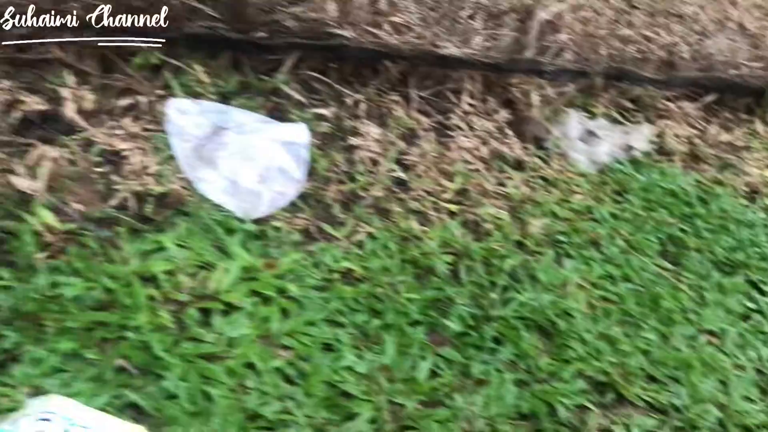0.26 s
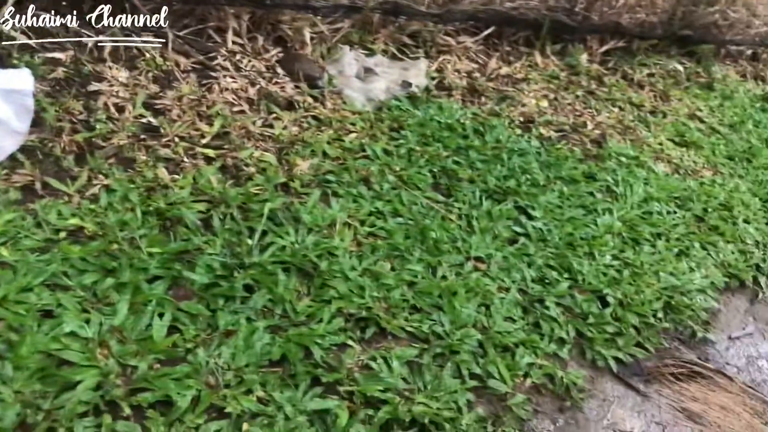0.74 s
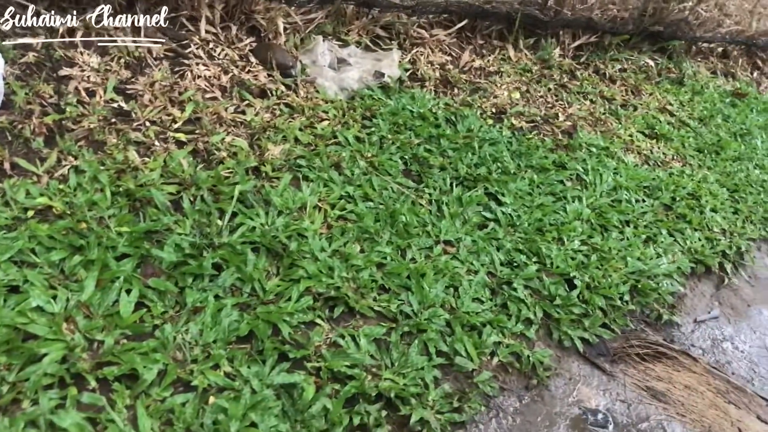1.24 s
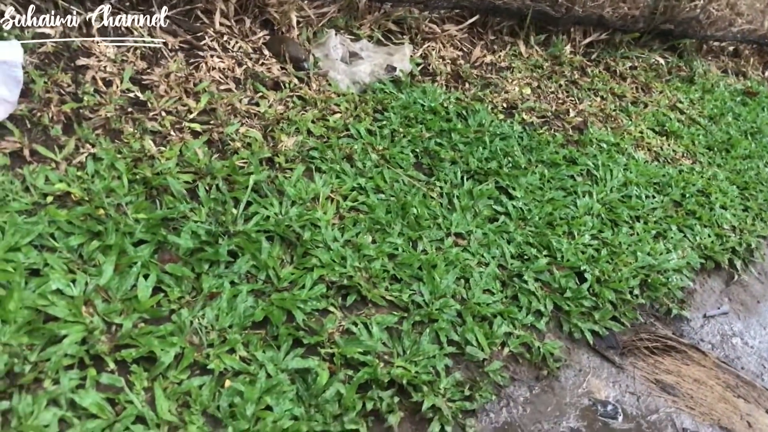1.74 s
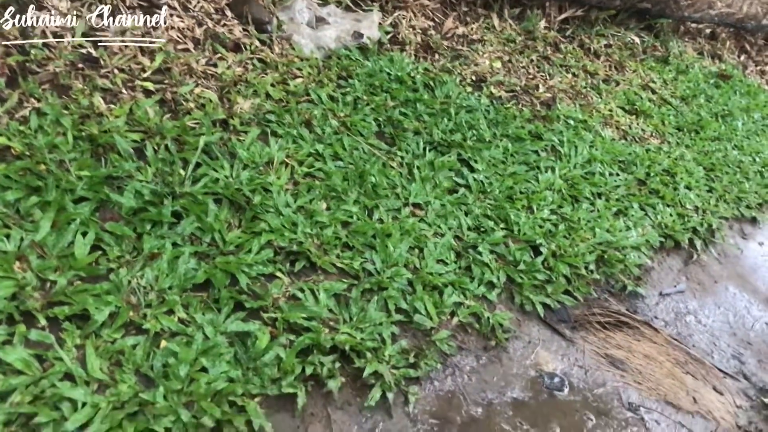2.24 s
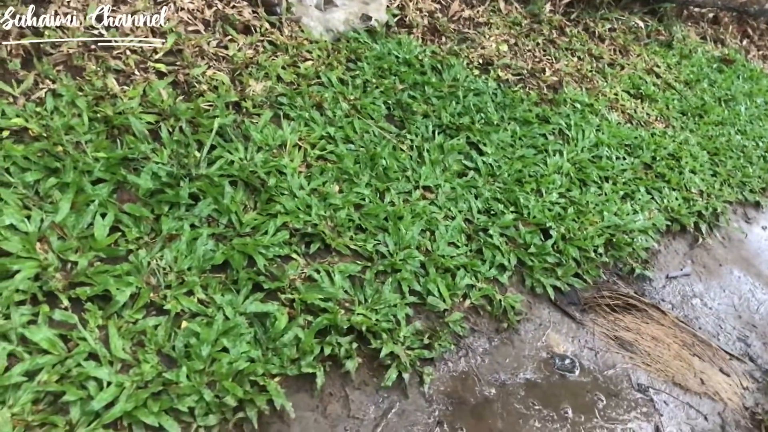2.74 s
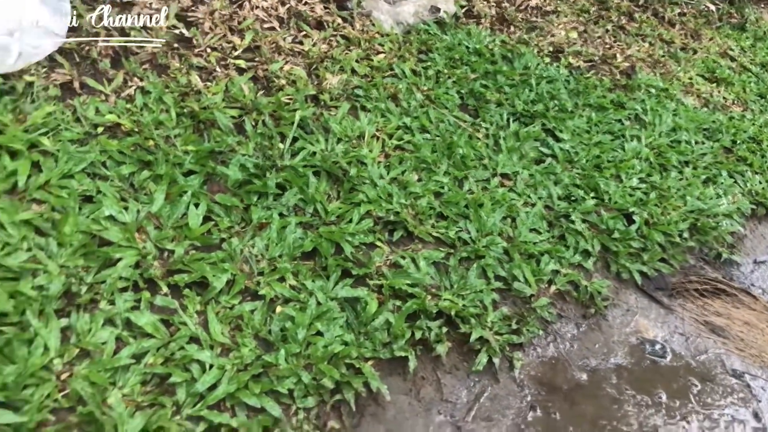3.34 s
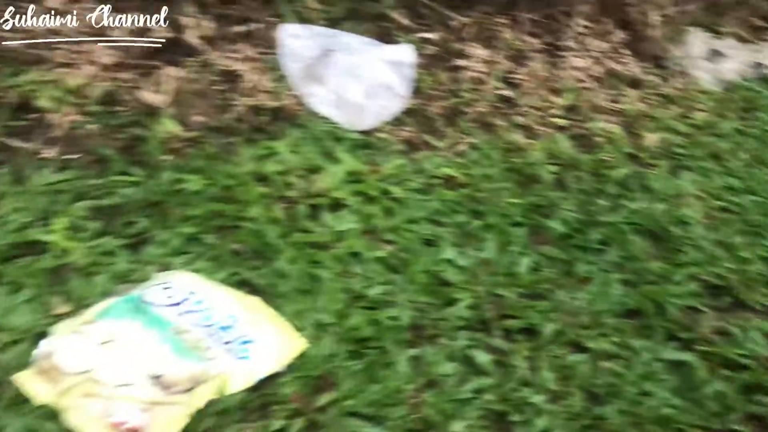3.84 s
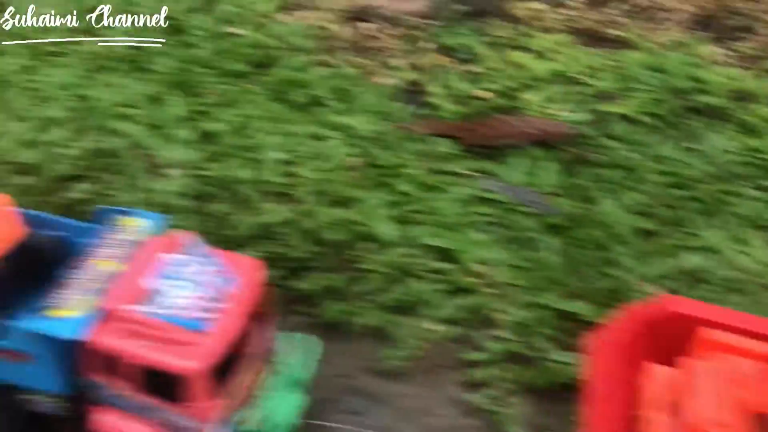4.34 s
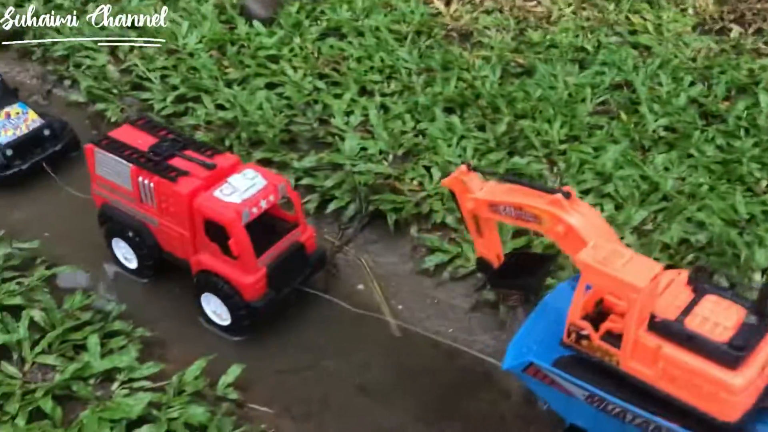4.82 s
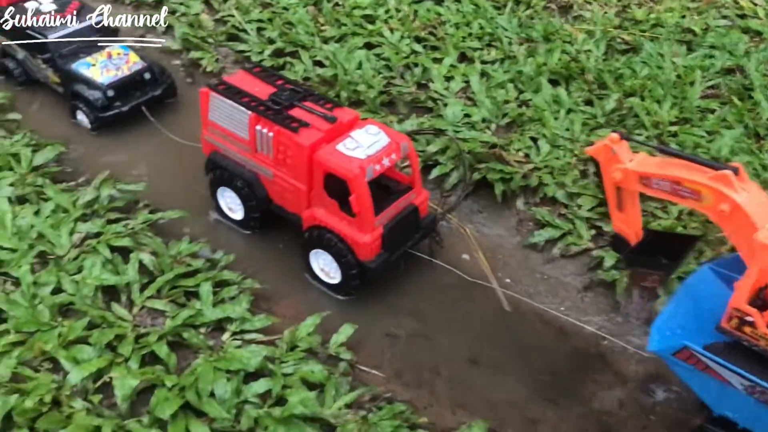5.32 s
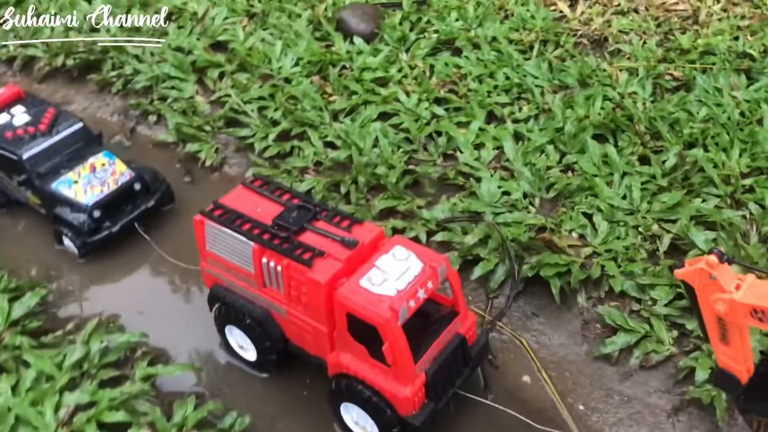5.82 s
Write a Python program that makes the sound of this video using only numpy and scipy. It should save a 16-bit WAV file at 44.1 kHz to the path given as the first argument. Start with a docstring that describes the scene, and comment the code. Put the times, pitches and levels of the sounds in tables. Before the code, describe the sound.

Someone shifts on wet grass and dead leaves beside plastic toy trucks. A busy first part of crunches, hollow clacks and crisp ticks holds one hard snap; it thins out, then a tight crunchy cluster returns. A cracking thump hits the microphone, fabric swishes with airy hiss, and toy wheels rasp in mud with light knocks. Dry, close outdoor sound with quiet rumbling air.

```python
"""Someone shifts on wet grass and dead leaves beside plastic toy trucks, heard in open air for six seconds.
Crunching scuffs (ringing fractures), hollow knocks (short rings with noise) and leaf ticks (bright noise)
begin over a low rumble; a squeak (gliding harmonics) comes early, then a plastic snap (decaying modes).
Later come a tap on the microphone (crack, rings and thump), a faint chirp (gliding tone) and a long hissy
swish, as of clothing rubbing (filtered noise); at last toy wheels grind in mud (fractures again)."""
import sys
import numpy as np
from scipy import signal
from scipy.fft import rfft, irfft, next_fast_len
from scipy.io import wavfile
from scipy.ndimage import uniform_filter1d

SR = 44100
rng = np.random.default_rng(int(sys.argv[2]) if len(sys.argv) > 2 else 0)


def store_wav(level_fs):
    """Save 16-bit WAV to argv[1]."""
    pcm = np.round(np.clip(np.atleast_2d(level_fs), -1, 1) * 32767)
    wavfile.write(sys.argv[1], SR, pcm.T.astype(np.int16))


N = 267819

# Hollow knocks: (time [s], ring frequency [Hz], ring rms over 10 ms [dB], contact hardness [0-1])
KNOCKS = [(0.242, 580, -42.5, 0.1), (0.4002, 566, -33, 0.37), (0.4468, 625, -43, 0.1),
          (0.8892, 365, -24.5, 0.45), (0.9013, 633, -31.5, 0.5), (0.943, 645, -33, 0.3),
          (0.9635, 368, -36, .1), (0.977, 905, -33.5, 0), (1.006, 383, -38.5, 0.2), (1.056, 645, -41, 0.66),
          (1.112, 606, -39, 1), (1.1586, 720, -34.5, 0.89), (1.181, 687, -31.5, 0.2),
          (1.244, 574, -39, .05), (1.404, 610, -44.5, 0.67), (1.6093, 780, -44.5, 0.4),
          (1.634, 940, -38.5, 0.68), (1.645, 815, -34.5, 0.52), (1.965, 990, -33.5, 0.45),
          (2.188, 657, -35.5, .6), (2.28, 1084, -33.5, 0.8), (2.322, 284, -35.5, 0.4),
          (2.41, 630, -40.5, 0.78), (2.919, 1150, -51.5, 0.77), (3.211, 880, -48, .4),
          (3.3636, 605, -32.5, .5), (3.4, 428, -26.5, 0.56), (3.4044, 517, -25.5, .5),
          (3.4246, 540, -27.5, 0), (3.5145, 570, -40, .05), (3.598, 334, -46, 0.7), (3.856, 593, -40, 0.86),
          (4.906, 1020, -42.5, .3), (5.0166, 647, -35.5, 0.53), (5.288, 540, -38, 0.74),
          (5.3608, 480, -36.5, 0.2), (5.611, 387, -39, .4), (5.657, 586, -37.5, .15),
          (5.714, 2230, -38.5, 0.88), (5.8, 520, -37, .5), (5.968, 560, -38, 0.3),
          (6.044, 1160, -34.5, 0.77)]
# Scuffs of a shoe: (start [s], end [s], crunch level [dB], grit relative to crunch [dB])
SCUFFS = [(0.0, 0.037, -41.5, -14), (0.378, 0.424, -41, -23), (0.891, 0.918, -38.5, -8),
          (0.949, 1.013, -41, -20), (1.109, 1.2, -35, -17), (1.208, 1.225, -42, -9.5),
          (1.633, 1.641, -41, -7), (2.314, 2.411, -43, -10), (3.354, 3.378, -34, -22),
          (3.395, 3.459, -34.5, -16.5), (3.464, 3.492, -39.5, -20)]
# Low, hollow resonances of the crunch: (frequency [Hz], width [Hz], relative level [dB])
HOLLOW_MODES = [(131, 124, -8), (270, 57, -5), (367.5, 61, -0.5), (556, 62, 1.5), (655, 73, -1),
                (935, 163, -5.5)]
# Rasping upper resonances of the crunch: (frequency [Hz], width [Hz], relative level [dB])
RASP_MODES = [(1374, 200, 1), (1715, 205, -0.5), (2250, 1300, -8)]
# Pull on the wheels grinding in mud: (time [s], relative level [dB])
WHEEL_PULL = [(4.7, -35), (4.9, -14), (5.08, 1), (5.27, -0.5), (5.42, -4.5), (5.7, 1), (5.82, -2.5),
              (5.9, -6.5), (6.07, -6)]
# Modes of the snapping plastic: (frequency [Hz], relative level [dB], t60 [s])
SNAP_MODES = [(604, -24, 0.045), (1030, -18, 0.029), (1310, -20, .018), (1690, -15.5, 0.017),
              (1840, -20, 0.016), (2300, -12, 0.01), (2630, -22.5, .012), (3260, -23.5, 0.015),
              (3770, -17.5, 0.0046), (4680, -22.5, 0.0078), (5630, -25, 0.02), (8400, -36, 0.019)]
# Contacts of the snap: (time [s], relative level [dB])
SNAP_CONTACTS = [(1.292, 1), (1.294, -11)]
# Swishes: (start [s], end [s], initial top level [dB], initial body level [dB])
SWISHES = [(0.537, 0.68, -55, -49), (0.9, 1.118, -59.5, -55.5), (3.9, 4.01, -53, -54),
           (4.01, 4.1, -47.5, -47.5), (4.283, 4.533, -36, -37), (4.53, 4.672, -38.5, -40.5),
           (4.78, 5.137, -52.5, -48.5), (5.39, 5.51, -47.5, -49), (5.618, 5.71, -53, -54),
           (5.87, 5.945, -48, -50)]
# Background hiss, stronger in the last seconds: (time [s], top level [dB], body level [dB])
HISS = [(0, -63, -60.5), (0.8, -59, -56.5), (1.5, -64, -61), (3.7, -62, -61), (4.2, -61, -50.5),
        (4.72, -54, -51), (5.3, -54, -50.5), (6.07, -54.5, -55)]
# Noise spectrum of the thin top of swish and hiss: (frequency [Hz], relative density [dB per Hz])
SWISH_TOP = [(6200, -10.5), (7600, -7.5), (9000, -2.5), (10400, -7), (12000, 0), (15500, 0.5),
             (16000, -7.5)]
# Noise spectrum of the body of swish and hiss: (frequency [Hz], relative density [dB per Hz])
SWISH_BODY = [(450, -8), (700, -2.5), (1050, 3.5), (1400, 1), (4400, 1), (5100, -1.5), (6500, -2),
              (8000, -8.5)]
# Leaf ticks: (time [s], top rms over 10 ms [dB], lower click relative to top [dB])
TICKS = [(0.242, -53, -5), (0.283, -42.5, -11.5), (1.081, -48, -3), (1.1591, -47, -1),
         (1.4038, -39.5, -3.5), (1.6808, -43.5, 4), (1.779, -52.5, -4), (1.9262, -46, -4),
         (1.9342, -42, -2), (2.1883, -38.5, -9), (2.2798, -35, 0), (2.4658, -39, -4), (2.631, -47.5, 7.5),
         (2.844, -48, -0.5), (2.9523, -53, -2), (3.2192, -49, -1), (3.3994, -41, -2), (3.643, -51.5, -4),
         (3.8558, -37, -20), (4.0097, -40, -2), (5.8917, -43.5, -9)]
# Rubbing squeak: (time [s], mean frequency [Hz], mean level [dB])
SQUEAK = [(.305, 850, -60), (.325, 815, -49.5), (.365, 803, -47.5), (.382, 790, -41), (.4, 743, -50),
          (.41, 730, -70)]
# Faint dipping chirp, as of a far bird: (time [s], mean frequency [Hz], mean level [dB])
BIRD = [(4.14, 2990, -72), (4.17, 3090, -52), (4.2, 2523, -56), (4.235, 2485, -60), (4.275, 2630, -50),
        (4.3, 2630, -53), (4.32, 2600, -75)]
# Noise spectrum of the open air: (frequency [Hz], relative density [dB per Hz])
AIR = [(30, -25), (45, -0.5), (60, 2.5), (95, -1), (140, -0.5), (200, -9.5), (300, -11), (450, -21),
       (600, -18.5), (1000, -18.5), (1500, -19.5), (2200, -25), (3500, -31)]

TIME = np.arange(N) / SR
HIT_TIME = np.arange(SR // 10) / SR   # 0.1 s for each short sound
# Levels against the ring of a knock at hardness 0, and the gain at hardness 1
SOFT_CLATTER_DB, HARD_CLATTER_GAIN_DB = -21, 23
SOFT_CRACK_DB, HARD_CRACK_GAIN_DB = -27.5, 22.5
# Rasp of a firm step, its growth in dB per dB of crunch, and the crunch of that firm step
RASP_DB, RASP_GROWTH, FIRM_STEP_DB = -39.5, 1.6, -35.5
# Wheel levels at a pull of 0 dB, and rasp growth in dB per dB of pull
WHEEL_HOLLOW_DB, WHEEL_RASP_DB, WHEEL_RASP_GROWTH = -41, -46, 1.47
SWISH_ATTACK_S, SWISH_RELEASE_S = 0.058, 0.047
TOP_SAG_DB_PER_S, BODY_SAG_DB_PER_S = 4, 20   # a swish weakens and thins as it goes
AIR_DB, RUMBLE_DB = -49.5, -57   # steady background
SWELL_START_S, SWELL_END_S, SWELL_DB = 0.12, 1.07, -50   # the rumble swells once
CUTOFF_HZ = 16000


def knocks(cycles=15.0, swell_s=.0016, dull_db=-4.0):
    """Impact: a ring loses 60 dB in a set number of cycles; harder contact excites more high frequencies."""
    out = np.zeros(N)
    for s, hz, db, hardness in KNOCKS:
        envelope = dying(cycles / hz) * (1 - np.exp(-HIT_TIME / swell_s))
        ring = unit_hit(np.sin(2 * np.pi * hz * HIT_TIME) * envelope)
        rattle = from_db(dull_db) * burst(205, 1030, t60=0.073, tail_db=-22, tail_t60=0.1)
        clatter_db = SOFT_CLATTER_DB + HARD_CLATTER_GAIN_DB * hardness
        clatter = from_db(clatter_db) * burst(910, 2200, t60=0.028, tail_db=-29, tail_t60=0.063)
        crack_db = SOFT_CRACK_DB + HARD_CRACK_GAIN_DB * hardness
        crack = from_db(crack_db) * burst(2460, 5430, t60=0.014, tail_db=-14, tail_t60=0.057)
        add(out, s, from_db(db) * (ring + rattle + clatter + crack))
    return out


def scuffs(attack_s=0.0042, release_s=0.0087):
    """Granular friction: a sliding shoe excites hollow crunch, force-dependent rasp and finer grit."""
    level = np.zeros((3, N))
    for start, end, db, grit_db in SCUFFS:
        rasp_db = RASP_DB + RASP_GROWTH * (db - FIRM_STEP_DB)
        levels = from_db([db, rasp_db, db + grit_db])
        level += np.outer(levels, stroke(start, end, attack_s, release_s))
    hollow = crunch(HOLLOW_MODES, 75, 1300, per_s=1100, spread_db=3.0, clump_db=1.5)
    rasp = crunch(RASP_MODES, 860, 2100, per_s=1100, spread_db=3.0, clump_db=2.5)
    fine = band(grains(2700, 4.0) * from_db(3.7 * drift(58)), 2300, 16000)
    grit = rms_one(band(fine, 1500, 5100, order=1) + from_db(2) * resonance(fine, 3160, 500))
    return np.sum(level * [hollow, rasp, grit], axis=0)


def wheels():
    """Rolling friction: hollow wheels grind unevenly, and the rasp grows faster than the pull."""
    pull_db, = in_time(WHEEL_PULL)
    hollow_level = from_db(WHEEL_HOLLOW_DB + pull_db)
    hollow = hollow_level * crunch(HOLLOW_MODES, 170, 1240, per_s=500, spread_db=3.5, clump_db=3.0)
    rasp_level = from_db(WHEEL_RASP_DB + WHEEL_RASP_GROWTH * pull_db)
    rasp = rasp_level * crunch(RASP_MODES, 1470, 2270, per_s=800, spread_db=3.5, clump_db=3.0)
    return (hollow + rasp) * (TIME > WHEEL_PULL[0][0])


def snap():
    """Modal excitation: hard plastic clicks home and touches once more, each contact ringing its modes."""
    ring = sum(from_db(db) * np.sin(2 * np.pi * hz * HIT_TIME) * dying(t60) for hz, db, t60 in SNAP_MODES)
    ring = band(ring, 1030, 12000)   # a small shell radiates little bass
    out = np.zeros(N)
    for s, db in SNAP_CONTACTS:
        noise = from_db(-36.5) * burst(2700, 19000, t60=0.0038, tail_db=-4, tail_t60=0.041)
        add(out, s, from_db(db) * (ring + noise))
    return out


def microphone_tap(s=3.8884, port_hz=1150, start_hz=125, end_hz=54, sag_s=0.0089, thump_delay_s=0.00452):
    """Transient response: a crack and two short rings precede a thump that sags in pitch."""
    out = np.zeros(N)
    crack = band(signal.unit_impulse(len(HIT_TIME)), 980, 4200, order=1)
    add(out, s, from_db(-27.5) * unit_hit(crack))
    port_ring = np.sin(2 * np.pi * port_hz * HIT_TIME) * HIT_TIME * dying(0.0056)
    add(out, s, from_db(-19.0) * unit_hit(port_ring))
    thump_hz = end_hz + (start_hz - end_hz) * np.exp(-HIT_TIME / sag_s)
    phase = 2 * np.pi * np.cumsum(thump_hz) / SR
    add(out, s + thump_delay_s, from_db(-18.5) * unit_hit(np.sin(phase) * dying(0.06)))
    low_ring = np.sin(2 * np.pi * 260 * HIT_TIME) * dying(0.013)
    add(out, s, from_db(-24.0) * unit_hit(low_ring))
    return out


def swish():
    """Incoherent summation: countless brushing contacts merge into fluttering noise, so powers add."""
    top_power, body_power = from_db(in_time(HISS)) ** 2
    for start, end, top_db, body_db in SWISHES:
        top_stroke = stroke(start, end, SWISH_ATTACK_S, SWISH_RELEASE_S, TOP_SAG_DB_PER_S)
        body_stroke = stroke(start, end, SWISH_ATTACK_S, SWISH_RELEASE_S, BODY_SAG_DB_PER_S)
        top_power = top_power + (from_db(top_db) * top_stroke) ** 2
        body_power = body_power + (from_db(body_db) * body_stroke) ** 2
    top = np.sqrt(top_power) * from_db(1.7 * drift(32)) * coloured(SWISH_TOP)
    body = np.sqrt(body_power) * from_db(1.34 * drift(36)) * coloured(SWISH_BODY)
    return top + body


def ticks():
    """Brief broadband impulses: leaves give bright ticks in two bands, each with a faint tail."""
    out = np.zeros(N)
    for s, db, low_db in TICKS:
        low = from_db(low_db) * burst(2880, 9300, t60=0.0018, tail_db=-15.5, tail_t60=0.026)
        top = burst(9500, 18100, t60=0.0014, tail_db=-13.0, tail_t60=0.019)
        add(out, s, from_db(db) * (low + top))
    return out


def squeak():
    """Tonal friction: rubbing gives a wavering tone of falling pitch."""
    return whistle(SQUEAK, overtone_db=-11, waver=0.0284)


def bird():
    """Frequency modulation: a nearly pure tone dips and wavers as a faint chirp."""
    return whistle(BIRD, overtone_db=-27, waver=0.018)


def outdoors():
    """Ambient noise: a distant hum of the air, a low rumble that swells and a faint scattered patter."""
    swell = from_db(SWELL_DB) * stroke(SWELL_START_S, SWELL_END_S, attack_s=0.33, release_s=0.09)
    rumble_noise = rms_one(band(rng.standard_normal(N), 61.0, 142.4, order=3))
    rumble = (from_db(RUMBLE_DB) + swell) * rumble_noise
    patter = sum(resonance(grains(6, 2.6), hz, 170) for hz in np.geomspace(450, 1200, num=6))
    return from_db(AIR_DB) * coloured(AIR) + rumble + from_db(-62.0) * rms_one(patter)


def crunch(modes, low_hz, high_hz, per_s, spread_db, waver_db=None, clump_db=0.0):
    """Stochastic excitation: dense fractures ring broad resonances, with a randomly wavering level."""
    clicks = grains(per_s, spread_db)
    # neighbouring modes have opposite sign
    x = sum((-1) ** k * from_db(db) * resonance(clicks, hz, width)
            for k, (hz, width, db) in enumerate(modes))
    x = band(x, low_hz, high_hz)
    even = x / np.sqrt(uniform_filter1d(x ** 2, size=1200) + 1e-12)   # level out over 27 ms
    return rms_one(even * from_db(clump_db * drift(45)))


def whistle(rows, overtone_db, waver):
    """Harmonic series: a tone and two overtones waver in pitch and level along a given course."""
    hz, db = in_time(rows)
    phase = 2 * np.pi * np.cumsum(hz * (1 + waver * drift(65.2))) / SR
    tone = sum(from_db(overtone_db * np.log2(k)) * np.sin(k * phase) for k in range(1, 4))
    sounding = (TIME > rows[0][0]) * (TIME < rows[-1][0])
    return from_db(db + 3.6 * drift(50)) * rms_one(tone) * sounding


def burst(low_hz, high_hz, t60, tail_db, tail_t60):
    """Double decay: band-limited noise dies quickly over a weaker, longer tail."""
    envelope = dying(t60) + from_db(tail_db) * dying(tail_t60)
    return unit_hit(band(rng.standard_normal(len(HIT_TIME)) * envelope, low_hz, high_hz))


def grains(per_s, spread_db):
    """Random point process: tiny fractures of either sign, mostly weak with a few strong ones."""
    sizes = from_db(spread_db * np.minimum(rng.exponential(1, N), 3.5))
    return (rng.random(N) < per_s / SR) * sizes * rng.choice([-1, 1], N)


def coloured(spectrum):
    """Spectral shaping: steady noise of rms 1 follows a spectrum and falls away beyond its ends."""
    hz, db = np.transpose(spectrum)
    size = next_fast_len(N)
    f = np.maximum(np.fft.rfftfreq(size, 1 / SR), 1)
    ends = np.minimum(f / hz[0], 1) ** 3 * np.minimum(hz[-1] / f, 1) ** 3
    gain = ends * from_db(np.interp(np.log(f), np.log(hz), db))
    return rms_one(irfft(rfft(rng.standard_normal(size)) * gain, size)[:N])


def drift(corner_hz):
    """Low-pass random process: two equal poles give a smooth wander of rms 1."""
    step = 40   # samples between computed points
    r = np.exp(-2 * np.pi * corner_hz * step / SR)
    noise = rng.standard_normal(N // step + 2002)
    slow = signal.lfilter([1], [1, -2 * r, r * r], noise)[2000:]   # skip the filter's onset
    return np.interp(np.arange(N) / step, np.arange(len(slow)), rms_one(slow))


def stroke(start, end, attack_s, release_s, sag_db_per_s=0):
    """Amplitude envelope: linear rise, hold with an optional sag, exponential release."""
    age = np.maximum(TIME - start, 0)
    release = np.exp(-np.maximum(TIME - end, 0) / release_s)
    return np.minimum(age / attack_s, 1) * from_db(-sag_db_per_s * age) * release


def dying(t60):
    """Exponential damping: the amplitude falls 60 dB in t60 seconds."""
    return from_db(-60 * HIT_TIME / t60)


def resonance(x, hz, width_hz):
    """Damped resonator: two poles set frequency and width, with a peak gain near 1."""
    r = np.exp(-np.pi * width_hz / SR)
    poles = [1, -2 * r * np.cos(2 * np.pi * hz / SR), r * r]
    return signal.lfilter(np.array([1, 0, -1]) * (1 - r * r) / 2, poles, x + 1e-18)


def band(x, low_hz, high_hz, order=2):
    """Band limitation: a causal Butterworth filter passes one frequency range."""
    edges = [low_hz, min(high_hz, .45 * SR)]
    return signal.sosfilt(signal.butter(order, edges, "band", fs=SR, output="sos"), x + 1e-18)


def from_db(db):
    """Logarithmic level: 20 dB is a factor of ten in amplitude."""
    return 10 ** (np.asarray(db) / 20)


def rms_one(x):
    """Power normalization: scale to an rms of 1."""
    return x / np.sqrt(np.mean(x ** 2) + 1e-20)


def unit_hit(x):
    """Energy normalization: scale a short sound to the energy of 10 ms at rms 1."""
    return x / np.sqrt(np.sum(x ** 2) / (.01 * SR))


def in_time(rows):
    """Linear interpolation: give the columns of a curve at every sample."""
    s, *columns = np.transpose(rows)
    return [np.interp(TIME, s, c) for c in columns]


def add(out, s, sound):
    """Superposition: mix a sound in at time s."""
    at = max(0, round(s * SR))
    out[at:at + len(sound)] += sound[:N - at]


def scene():
    """Superposition: all sounds add at one microphone, the same in both channels."""
    toys_and_steps = knocks() + scuffs() + wheels() + snap() + microphone_tap()
    surroundings = swish() + ticks() + squeak() + bird() + outdoors()
    mono = toys_and_steps + surroundings
    return np.array([mono, mono])


def record(dry, low_cut_hz=42):
    """Limited bandwidth: the microphone drops the deep bass and the top is cut steeply."""
    lean = signal.sosfilt(signal.butter(2, low_cut_hz, "high", fs=SR, output="sos"), dry)
    return signal.sosfilt(signal.ellip(10, .2, 80, CUTOFF_HZ, fs=SR, output="sos"), lean)


dry = scene()
out = record(dry)
store_wav(out)
```